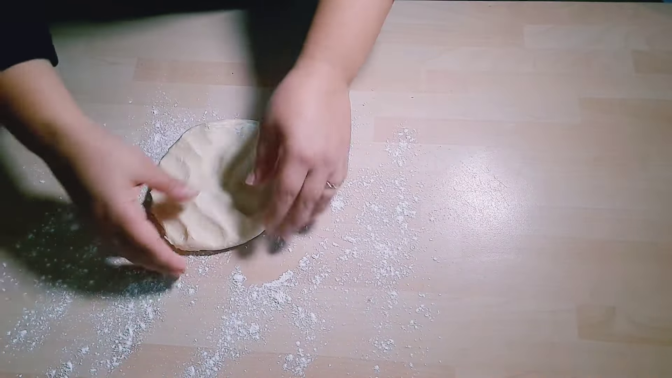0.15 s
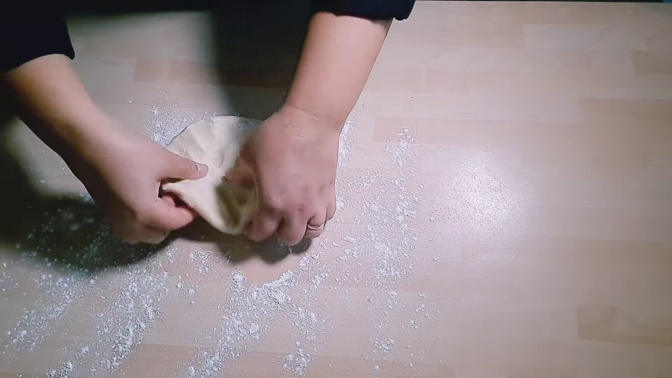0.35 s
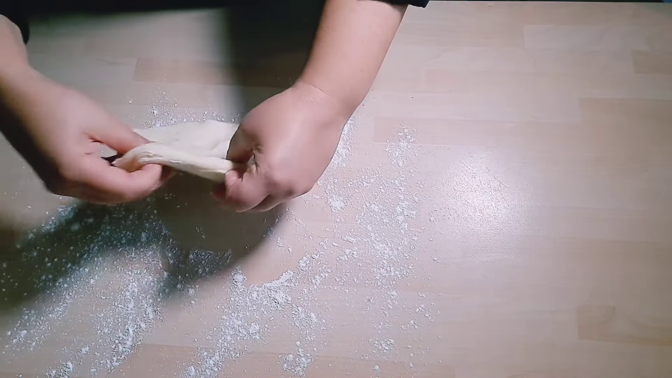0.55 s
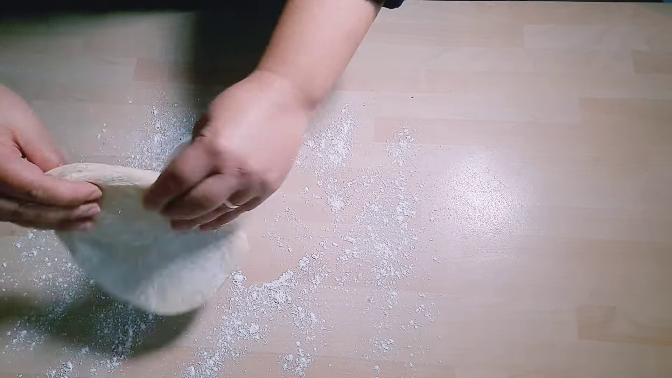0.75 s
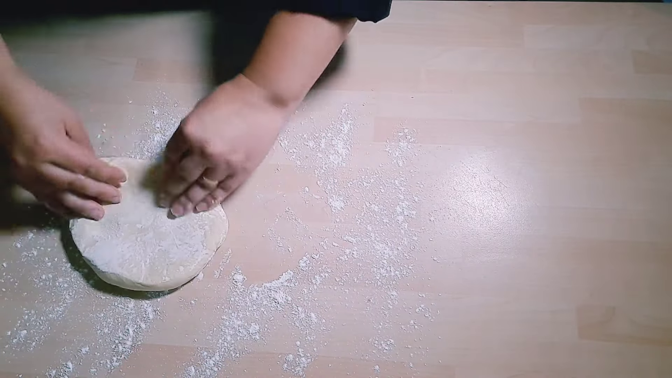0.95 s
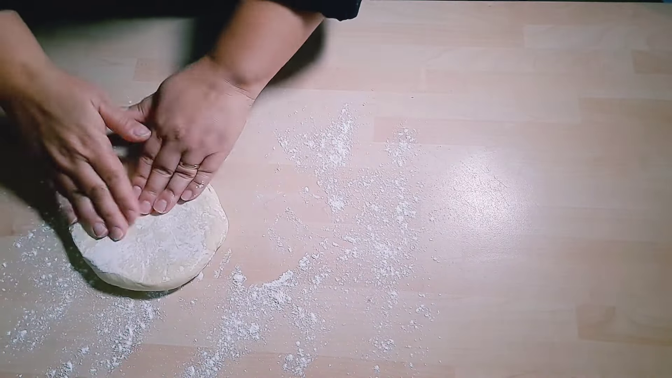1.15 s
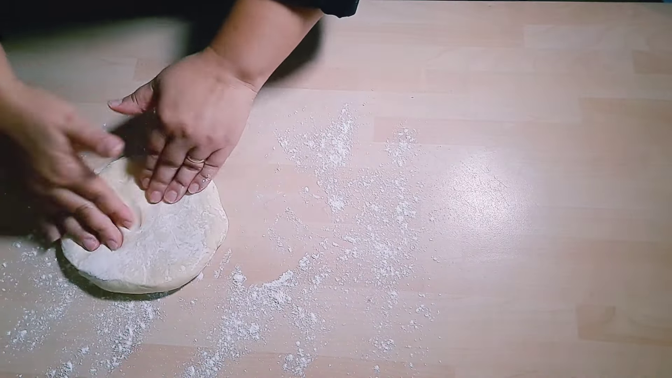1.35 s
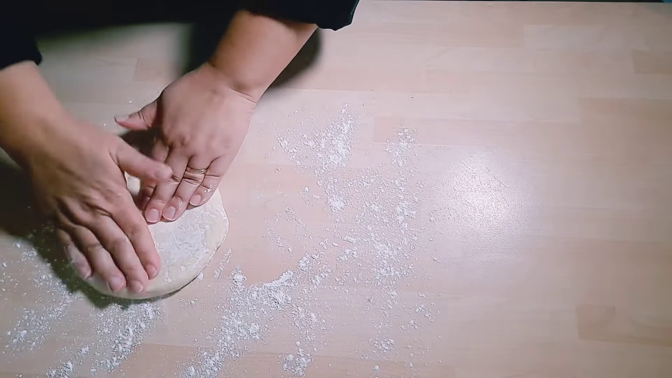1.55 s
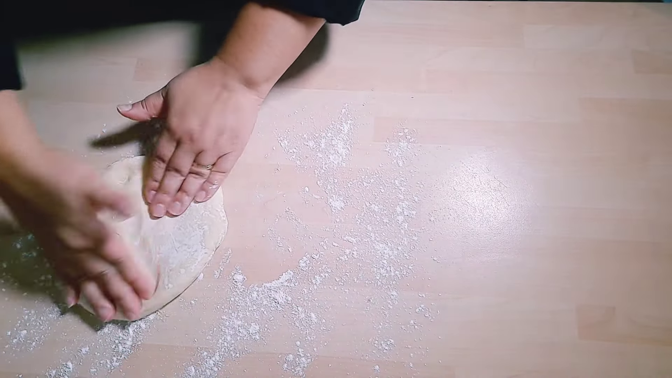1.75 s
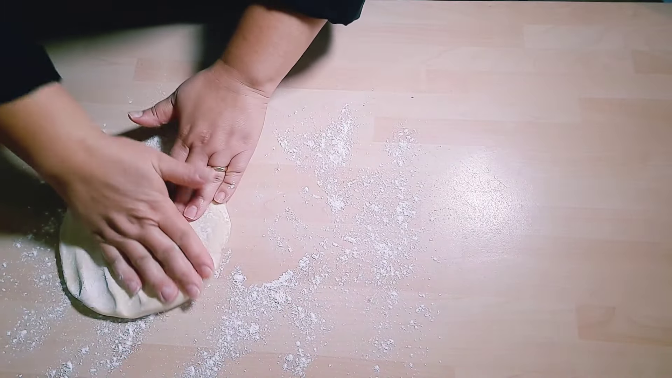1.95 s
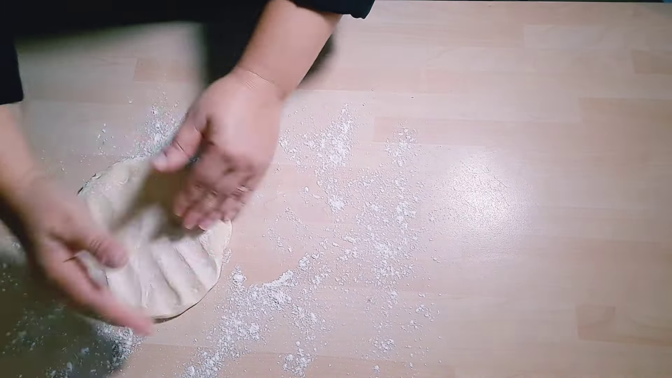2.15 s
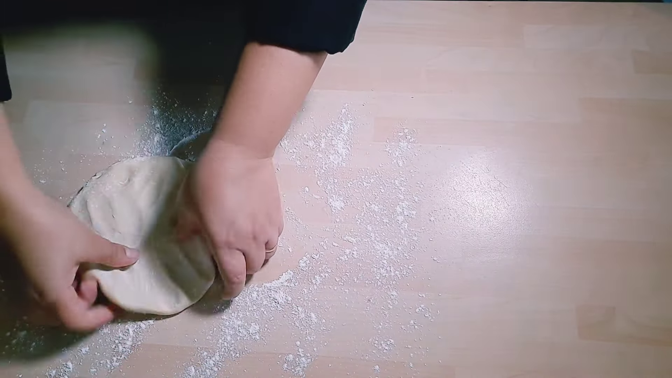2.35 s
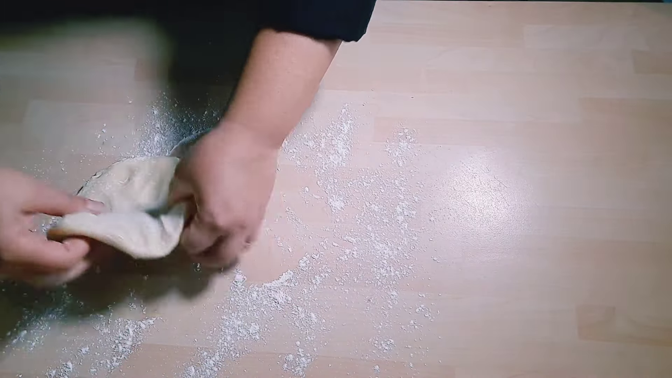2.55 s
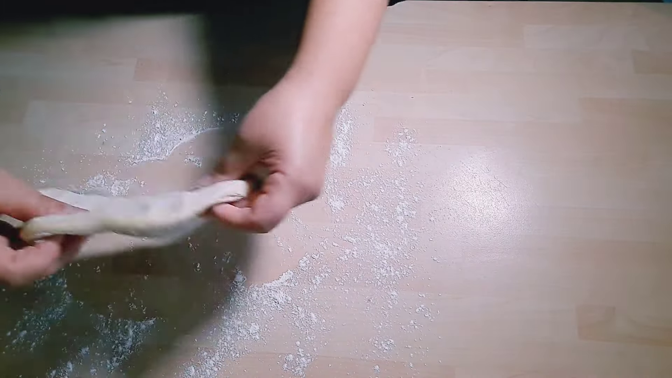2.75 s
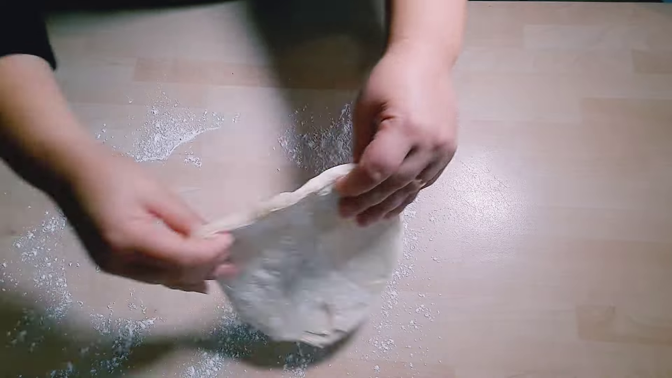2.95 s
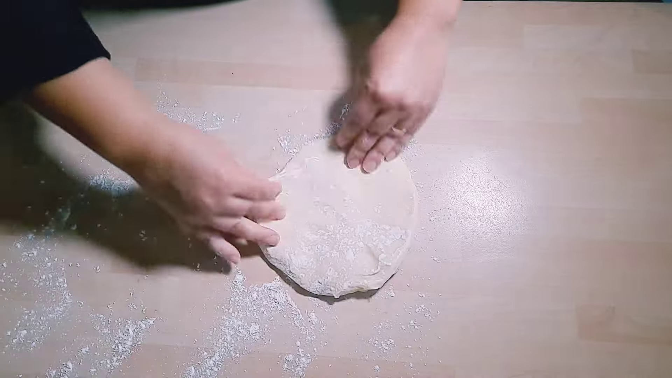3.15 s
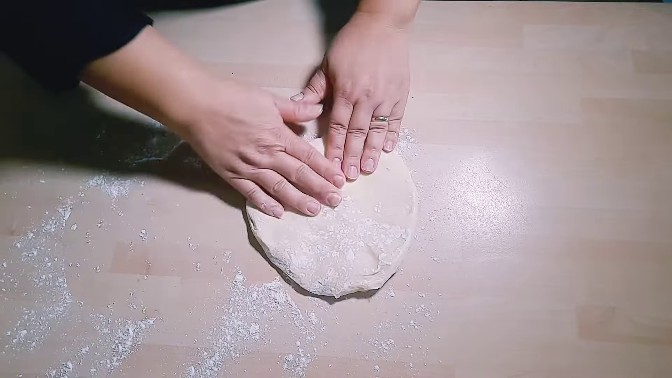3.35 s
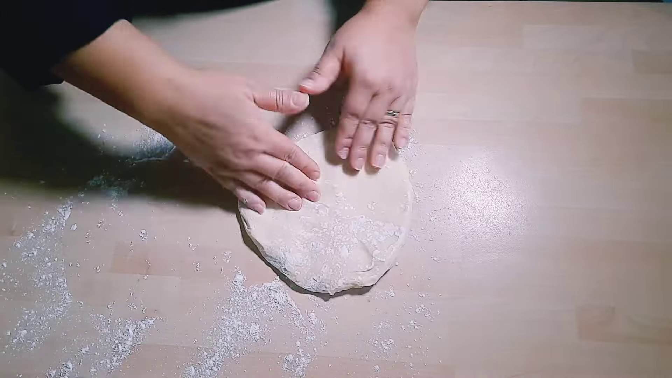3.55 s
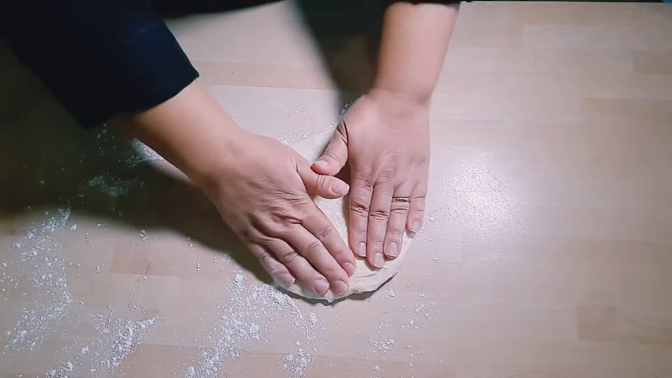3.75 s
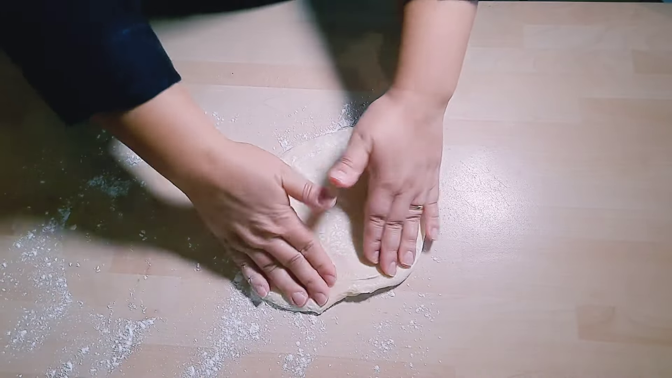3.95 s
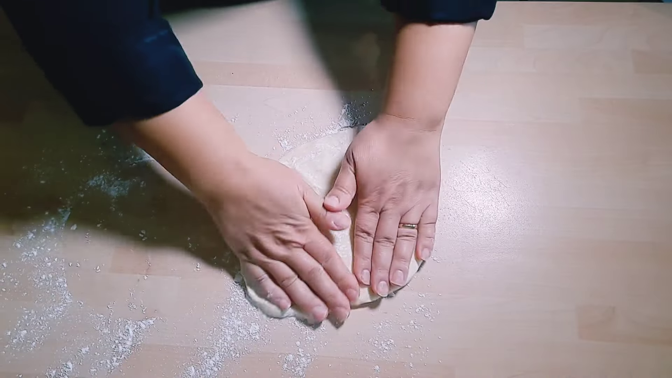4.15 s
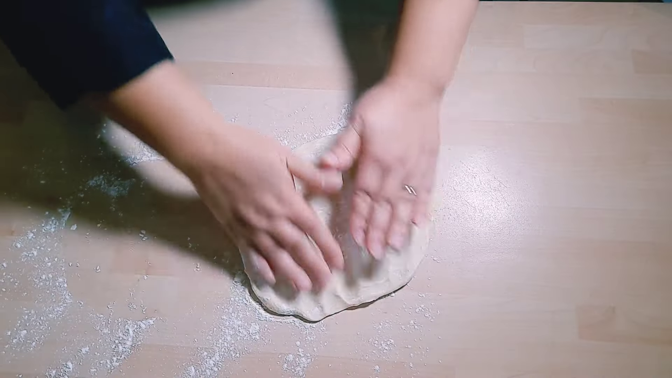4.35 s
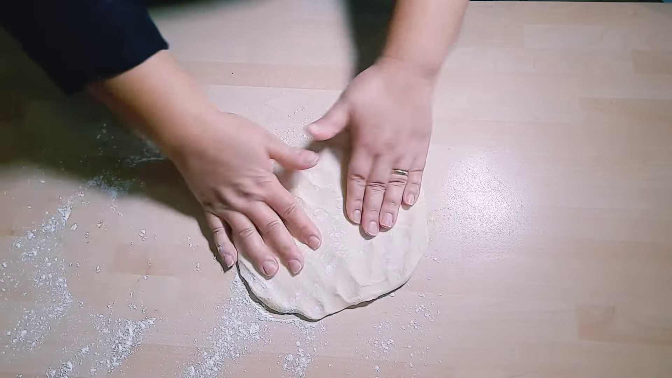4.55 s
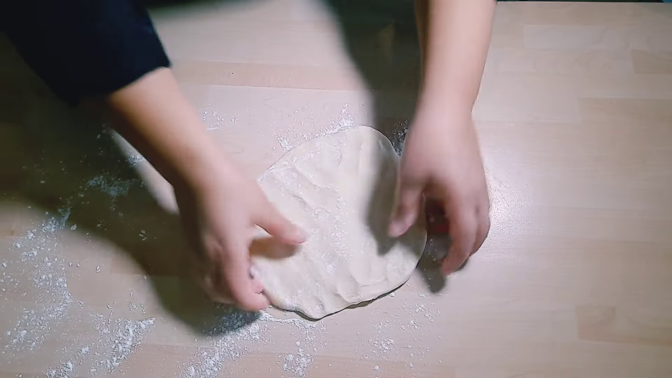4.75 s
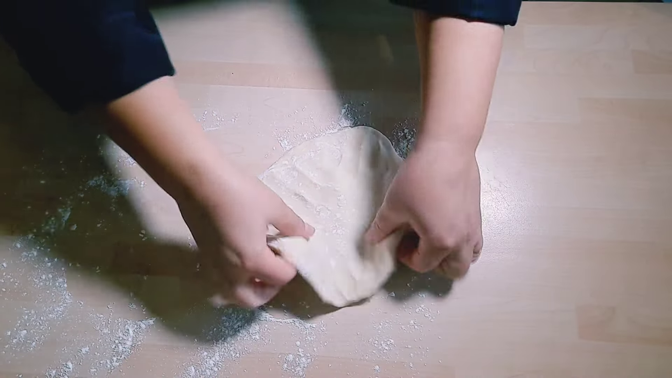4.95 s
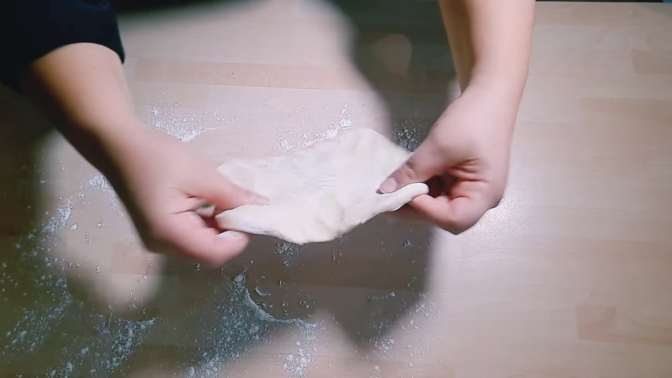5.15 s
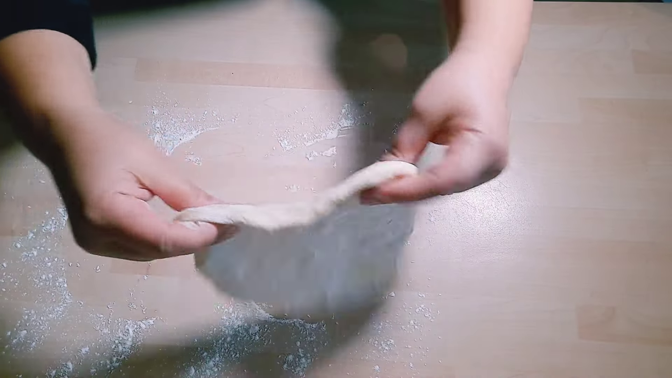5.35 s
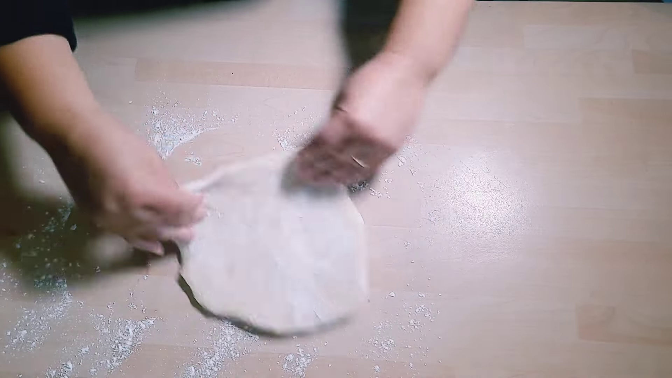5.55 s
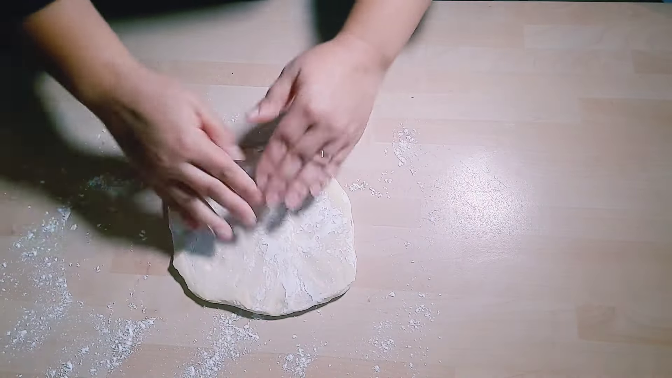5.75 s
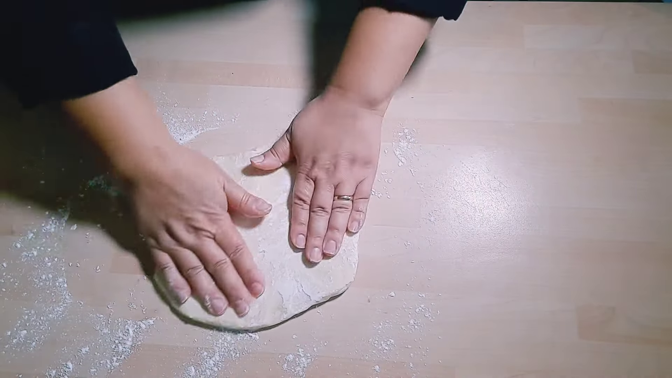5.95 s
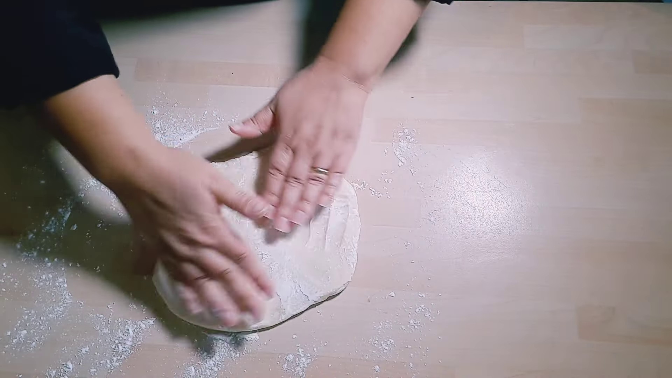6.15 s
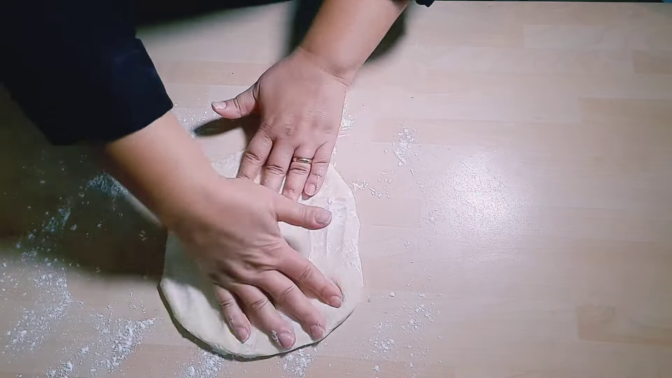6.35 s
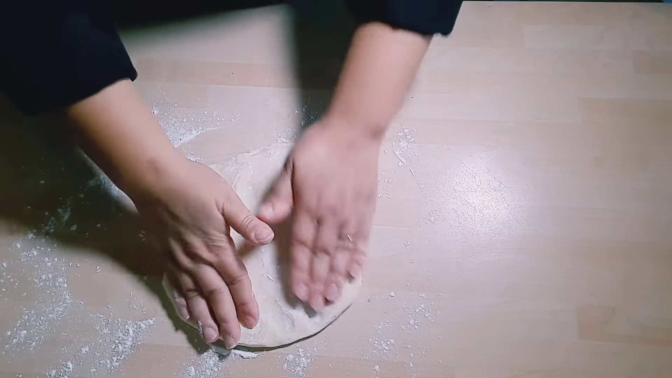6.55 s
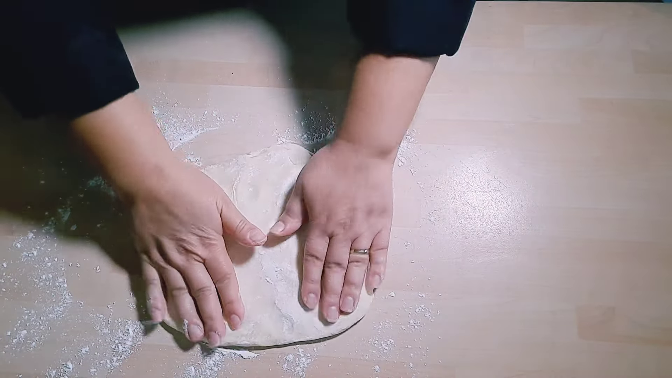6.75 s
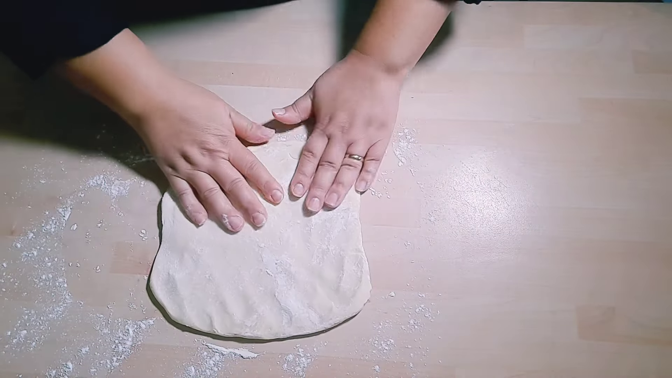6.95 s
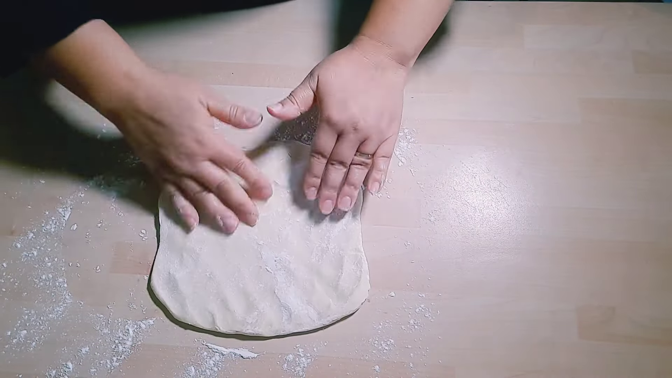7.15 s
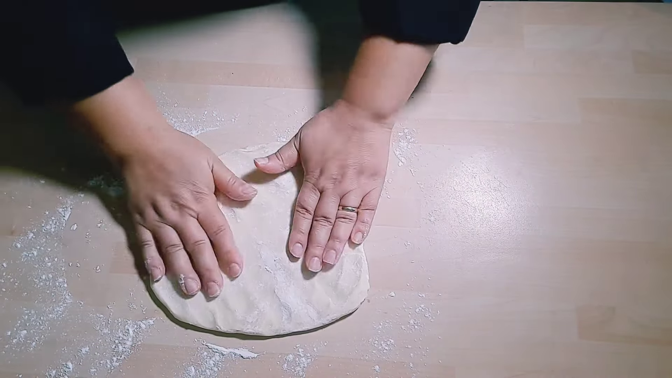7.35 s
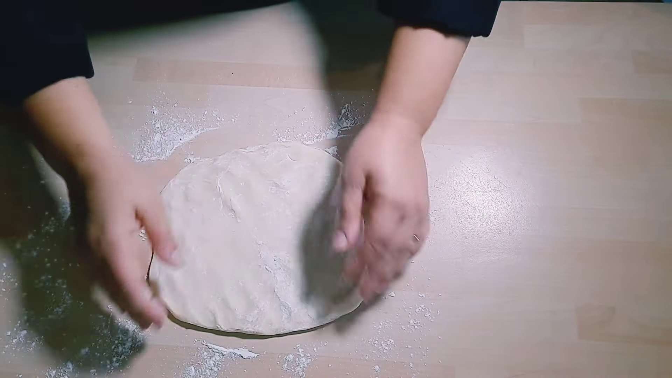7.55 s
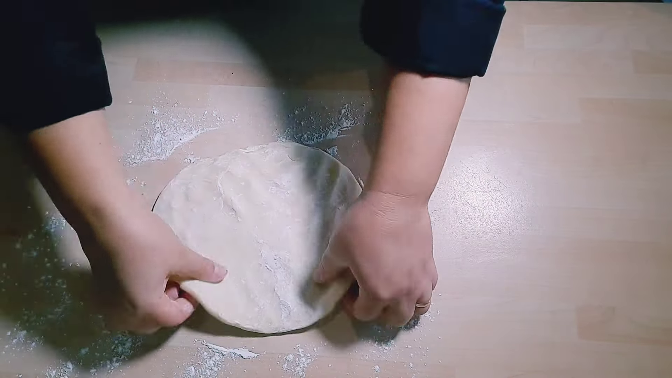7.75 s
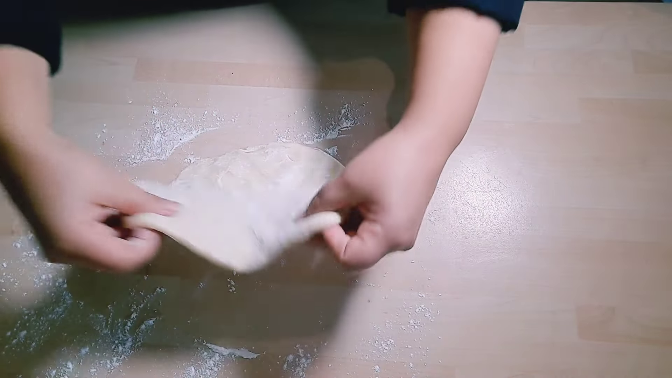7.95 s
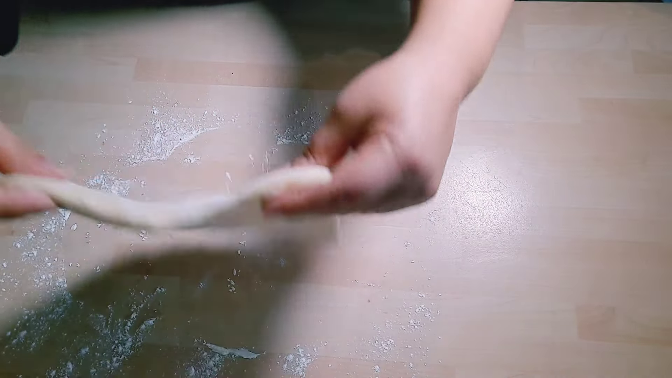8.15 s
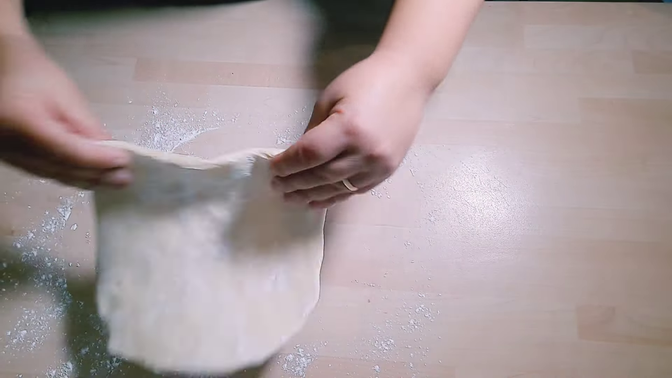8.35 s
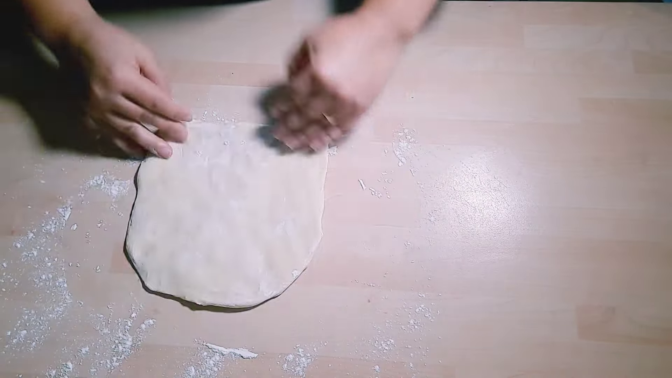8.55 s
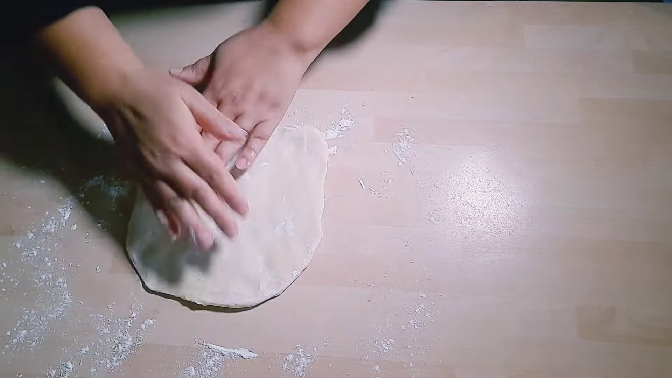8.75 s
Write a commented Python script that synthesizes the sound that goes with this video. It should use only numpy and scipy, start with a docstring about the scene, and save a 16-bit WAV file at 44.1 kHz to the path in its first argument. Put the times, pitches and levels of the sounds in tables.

```python
"""Hands pat, lift and drop a flat of soft dough on a wooden worktop in a quiet kitchen, in stereo.
Each blow rings the modes of the board as dying sines, and air slaps out from under the palm as a
resonant puff of noise. Squeaks of trapped air, bright cracks and the swelling noise of floury skin on
dough lie around the blows. Bare walls return a short echo; room hum and microphone hiss lie behind."""
import sys
import numpy as np
from scipy import signal
from scipy.fft import rfft, irfft
from scipy.io import wavfile
from scipy.ndimage import uniform_filter1d

SR = 44100
rng = np.random.default_rng(int(sys.argv[2]) if len(sys.argv) > 2 else 0)


def store_wav(level_fs):
    """Save 16-bit WAV to argv[1]."""
    pcm = np.round(np.clip(np.atleast_2d(level_fs), -1, 1) * 32767)
    wavfile.write(sys.argv[1], SR, pcm.T.astype(np.int16))


N = 388080  # length [samples]

# Palm, fingers or dough landing; levels are those of each layer before the mix: (time [s],
# slap [dB], deep ring [dB], middle ring [dB], knock ring [dB], treble crack [dB], slap pitch [Hz])
BLOWS = [(0.023, -52, -57.5, -67, -60.5, -67, 1800), (0.071, -69, -73, -67, -62.5, -74, 1940),
         (0.2125, -63, -59, -50, -47.5, -49.5, 1540), (0.2594, -49, -40.5, -40.5, -39.5, -53, 1530),
         (0.2883, -39, -47, -44.5, -47, -52, 1750), (0.5753, -77, -71, -85, -69, -73, 1530),
         (0.896, -38.5, -39, -36.5, -42.5, -60, 1630), (0.9236, -43, -38, -40, -44, -65, 1580),
         (0.957, -34, -35, -30.5, -63, -52, 1680), (0.9622, -26, -44, -52, -38.5, -62, 1440),
         (1.175, -59, -51.5, -59, -67.5, -81, 1600), (1.205, -66, -68, -60, -66, -66, 2160),
         (1.365, -61, -80, -62, -67, -76, 1250), (1.5335, -56, -47, -56.5, -65, -64, 1560),
         (1.8915, -62, -46, -52.5, -63, -66, 1270), (1.9284, -88, -49.5, -57.5, -66, -82, 1550),
         (2.265, -56, -54.5, -74, -50.5, -61, 2020), (2.3064, -65, -56, -45.5, -40.5, -51.5, 1540),
         (2.336, -64, -64, -40.5, -43.5, -48, 1210), (2.364, -46, -58, -42, -44, -65, 1620),
         (2.631, -61, -85, -70, -61, -56, 2010), (3.067, -62, -60, -64, -62, -73, 1200),
         (3.164, -74, -39, -41, -41, -64, 1570), (3.34, -57, -56, -61, -69, -59, 1800),
         (3.3577, -55, -46, -57, -64, -56, 1890), (3.749, -57, -58, -71, -53.5, -54, 1500),
         (4.117, -45.5, -46.5, -57.5, -68, -63, 1400), (4.442, -26, -33, -40, -43.5, -36.5, 1340),
         (4.7627, -64, -59, -59, -54, -52, 1870), (5.005, -56, -62, -76, -67.5, -59, 1240),
         (5.5502, -35, -37.5, -51, -42.5, -55, 1130), (5.563, -25.5, -56, -46, -41.5, -58, 1220),
         (5.6003, -21, -55, -44, -33.5, -44, 1780), (5.61, -24, -54, -61, -43, -43, 1400),
         (5.9394, -49, -61, -62, -78, -57, 2060), (6.223, -62, -54.5, -63, -63, -63, 1230),
         (6.2618, -70, -51.5, -64, -59.5, -67, 1860), (6.6488, -43.5, -38.5, -56, -72, -64, 1540),
         (6.6777, -53, -49, -54, -57, -53, 1550), (6.9527, -34.5, -38.5, -59, -40.5, -41, 1910),
         (6.967, -30, -35.5, -39, -42.5, -45, 1450), (7.3447, -26, -26, -39, -41, -54, 1950),
         (7.6835, -53, -64, -49, -45, -43, 1600), (7.718, -44, -82, -47.5, -40, -49, 1600),
         (8.464, -14.5, -57, -27, -28.5, -37, 2300), (8.471, -22.5, -24.5, -47, -29.5, -36, 1170)]
# Hands sliding on dough or lifting it; levels are before the mix, swell and fade each cover SPAN_DB:
# (time of full strength [s], swell [s], hold [s], fade [s], flour hiss [dB],
#  skin hiss over flour hiss [dB], press on the board [dB]); hold and fade are before stretching
STROKES = [(0.044, 0.12, .005, .12, -62.5, 3.5, -54.5), (0.205, 0.051, 0.16, 0.22, -55.5, -2, -47.5),
           (0.552, 0.17, .04, 0.047, -68, -18, -82), (0.912, 0.021, 0.075, 0.084, -57.5, 4.5, -53),
           (0.985, .012, .02, 0.085, -69.5, 18, -66), (1.242, 0.16, .005, .3, -61, -18, -64),
           (1.369, 0.034, .005, 0.17, -58.5, -12, -59), (1.58, .1, 0.025, 0.078, -63, -7, -53),
           (1.648, 0.17, 0.029, 0.35, -61.5, -17, -65), (1.975, 0.14, 0.22, 0.16, -64, -10, -65),
           (2.303, .055, .15, 0.12, -55.5, 2, -46.5), (2.541, 0.058, .005, 0.18, -56, -10, -62),
           (2.626, 0.16, .02, 0.14, -60.5, -4.5, -63), (2.86, 0.29, 0.0045, 0.31, -67.5, -20, -88),
           (3.148, 0.11, 0.023, 0.12, -51, -9, -55), (3.17, .012, .04, .08, -62, 4, -40),
           (3.363, 0.05, .05, 0.12, -62.5, 1, -52.5), (3.476, .2, .005, 0.32, -57.5, -7, -67),
           (3.755, 0.051, .09, .11, -54, -6, -54.5), (3.99, 0.37, .005, 0.13, -64.5, -2, -71),
           (4.14, .07, .005, 0.25, -54, -5, -61), (4.254, 0.081, 0.14, 0.76, -67, -3, -66.5),
           (4.445, 0.013, 0.027, 0.13, -51.5, 8, -37), (4.541, 0.033, .01, 0.076, -72, 13, -53),
           (4.61, 0.049, 0.0054, 0.11, -57.5, -9, -62.5), (4.773, 0.049, 0.11, 0.22, -54.5, 2, -58),
           (5.045, 0.55, 0.098, .14, -63, -10, -65), (5.3, 0.17, 0.042, 0.18, -96, 5, -67.5),
           (5.507, 0.26, 0.067, 0.11, -66.5, -7, -64), (5.559, 0.015, 0.044, 0.1, -49.5, 8, -58),
           (5.608, .01, 0.019, 0.082, -54, 16.5, -58), (5.933, 0.091, 0.1, 0.085, -49, -11, -58.5),
           (6.096, 0.032, 0.0046, 0.15, -56.5, -12, -65), (6.297, 0.057, 0.066, .09, -48.5, -11, -55.5),
           (6.458, 0.22, .005, 0.32, -61.5, -4, -68), (6.646, 0.088, 0.031, 0.18, -53, -5, -51.5),
           (6.813, 0.048, .005, 0.24, -55.5, -10, -64.5), (6.978, 0.049, 0.017, 0.12, -46, 3, -45),
           (7.174, 0.1, .005, 0.084, -65, -4, -76), (7.35, 0.012, 0.0041, 0.16, -53, 14, -34),
           (7.469, 0.054, 0.023, 0.15, -62.5, -15, -58), (7.718, 0.092, 0.0087, 0.17, -49, 6, -45),
           (7.87, 0.13, 0.089, 0.18, -65.5, -2, -65), (8.04, 0.14, .005, 0.14, -58, -10, -66),
           (8.244, 0.11, .02, 0.35, -76, 4, -63), (8.502, 0.03, 0.056, 0.1, -52, 17.5, -28),
           (8.786, 0.12, .005, 0.2, -67.5, 1.5, -69)]
# Likeness of the two channels for rubbing and cracks: (frequency [Hz], correlation [-1 to 1])
RUB_SAME = [(500, 0.24), (1500, 0.18), (3000, 0.04), (7000, 0.017)]

DEEP, MIDDLE, KNOCK, TOP = (0, 149), (149, 212), (212, 770), (770, 3000)  # mode families (from, to) [Hz]
SPAN_DB = 20  # level change over one swell or fade [dB]
FLOUR_LASTS, SKIN_LASTS, PRESS_LASTS = 0.85, 0.95, 0.6  # stretch of hold and fade
FLOUR_REST_DB, SKIN_REST_DB, PRESS_REST_DB = -81.5, -73.5, -72.5  # hands at rest, before the mix [dB]
SLAP_S, SLAP_SHARP = 0.00351, 1.98  # decay time [s]; pitch over width of each resonance pass
SQUEAK_SHARP = 8.5  # pitch over width of each resonance pass
QUIET_DB = -65.5
EDGE_HZ = 15800  # upper band limit [Hz]


def worktop():
    """Blows strike the board at once; leaning hands shake it faintly with a random force."""
    s, _, deep_db, middle_db, knock_db, *_ = np.transpose(BLOWS)
    press = stroking(np.transpose(STROKES)[-1], PRESS_LASTS, PRESS_REST_DB)
    board = np.zeros(N)
    # (modes, blow levels [dB], rise [s], share of the press [dB])
    families = (
        (DEEP, deep_db, 0.006, -4),
        (MIDDLE, middle_db, 0.004, -9),
        (KNOCK, knock_db, 0.0015, -5),
    )
    for modes, blow_db, rise_s, press_db in families:
        response = ring(modes, rise_s)
        force = np.zeros(N)
        force[(s * SR).astype(int)] = gain_of(blow_db)
        shaking = press * rng.standard_normal(N) / np.linalg.norm(response)
        force += gain_of(press_db) * shaking
        board += signal.fftconvolve(force, response)[:N]
    return board


def ring(family, rise_s):
    """Response of the board to one push: dying sines that start together, rms 1 in the first 40 ms."""
    # Worktop modes: (frequency [Hz], relative level [dB], t60 [s], sign of the first swing)
    modes = [(82.9, -7, 0.26, 1), (97.6, 6.5, .22, 1), (111.4, -5, 0.18, -1), (119.1, 8.5, 0.18, 1),
             (135, -34, 0.12, -1), (159.4, -8.5, 0.15, 1), (177.4, -16.5, 0.15, 1), (212, -4.5, 0.028, 1),
             (240, -4, 0.074, 1), (270, -3, 0.019, 1), (300, 0.5, 0.14, 1), (313.4, 7.5, 0.077, 1),
             (333.6, 7.5, 0.14, 1), (427.7, -11.5, 0.13, -1), (506, -14.5, 0.11, 1), (534.5, -32, 0.19, -1),
             (609, -11.5, 0.084, 1), (657, -26.5, 0.25, -1), (741, -12.5, 0.065, 1), (846, 7.5, 0.072, -1),
             (1165, 13.5, 0.022, 1), (1201, 4.5, 0.13, -1), (1599, 2.5, 0.06, 1), (1840, -5, 0.07, -1),
             (2176, 2.5, 0.042, 1), (2480, -23, 0.23, -1), (2940, -13, 0.14, 1)]
    t = np.arange(SR // 2) / SR
    response = np.zeros(len(t))
    for hz, db, t60, sign in modes:
        if family[0] < hz <= family[1]:
            decay = gain_of(db - 60 * t / t60)
            response += np.sign(sign) * decay * np.sin(2 * np.pi * hz * t)
    response *= (1 - np.exp(-t / rise_s)) ** 2  # soft flesh loads the board gradually
    return response / np.sqrt(np.mean(response[:SR // 25] ** 2))


def hollow(x):
    """Passes a sound through the high modes of the board."""
    response = ring(TOP, 0.0015)
    return signal.fftconvolve(x, response[None] / np.linalg.norm(response), axes=1)[:, :N]


def slaps():
    """Air squeezed from under hand or dough; the same smack rings the high modes of the board."""
    smacks = np.zeros(N)
    noises = rng.standard_normal((len(BLOWS), 2000))
    for (s, db, *_, hz), noise in zip(BLOWS, noises):
        add(smacks, s, puff(db, hz, SLAP_S, SLAP_SHARP, noise, pop=1.6))
    return smacks + gain_of(-23) * hollow(smacks[None])[0]


def squeaks():
    """A pocket of air under the cupped hand squeaks open: puffs of noise through a narrow resonance."""
    # Squeaks: (time [s], peak before the mix [dB], pitch [Hz], decay time [s])
    openings = [(3.341, -61, 1580, 0.025), (3.378, -63, 2050, 0.078), (6.011, -36.5, 1670, 0.012),
                (6.026, -43, 1615, 0.016), (6.043, -46, 1780, 0.0095), (6.08, -56, 1640, 0.046)]
    squeaking = np.zeros(N)
    noises = rng.standard_normal((len(openings), 4000))
    for (s, db, hz, decay_s), noise in zip(openings, noises):
        add(squeaking, s, puff(db, hz, decay_s, SQUEAK_SHARP, noise, pop=0))
    return squeaking


def puff(db, hz, decay_s, sharp, noise, pop):
    """A dying puff of noise, with an optional pop, rings a pocket of air; sharp is pitch over width."""
    u = np.arange(len(noise)) / SR / max(decay_s, 0.0005)
    sound = noise * np.exp(-u) * (1 - np.exp(-u / 0.37))
    sound[int(decay_s * SR / 2)] += pop * np.linalg.norm(sound)  # single-sample pop
    for _ in range(2):
        sound = signal.lfilter(*signal.iirpeak(hz, max(sharp, 0.5), SR), sound)
    return gain_of(db) * sound / abs(sound).max()


def add(mix, s, sound):
    """Mixes a sound in at a time in seconds."""
    part = mix[int(s * SR):][:len(sound)]
    part += sound[:len(part)]


def cracks():
    """Skin and flour meet at each blow: a sudden bright spray, a sharp front on a longer fizz."""
    # Colour of the spray: (frequency [Hz], relative level per Hz [dB])
    spray = [(1500, -3), (3000, -9.5), (5000, 1), (8000, -1), (9500, -9), (13000, -20.5), (16000, -6)]
    level = np.zeros(N)
    t = np.arange(8000) / SR
    fall = np.exp(-t / 0.0036) + 0.13 * np.exp(-t / 0.053)  # front, then fizz
    for s, *_, crack_db, _ in BLOWS:
        add(level, s, gain_of(crack_db) * fall)
    return level * hiss(spray, RUB_SAME, patchy_db=1.0, size=256)


def rubbing():
    """Flour grains give the bright hiss, broad skin contact the fuller one, which the board colours."""
    # Colour of flour grains: (frequency [Hz], relative level per Hz [dB])
    flour_colour = [(1470, -15), (2500, -8), (3110, -6.5), (3630, -5.5), (5230, -0.5), (6810, 0.5),
                    (7890, 1), (9360, -7), (13800, -2.5), (16000, -6)]
    # Colour of broad skin contact: (frequency [Hz], relative level per Hz [dB])
    skin_colour = [(500, 10.5), (800, -4.5), (1500, 0), (2200, 0), (3500, -4.5), (6000, -13)]
    *_, flour_db, fuller_db, _ = np.transpose(STROKES)
    flour = stroking(flour_db, FLOUR_LASTS, FLOUR_REST_DB)
    flour = flour * hiss(flour_colour, RUB_SAME, patchy_db=1.1, size=256)
    skin = stroking(flour_db + fuller_db, SKIN_LASTS, SKIN_REST_DB)
    skin = skin * hiss(skin_colour, RUB_SAME, patchy_db=2.5, size=256)
    return flour + gain_of(-3.5) * skin + gain_of(-20.5) * hollow(skin)


def stroking(peak_db, lasts, rest_db):
    """Level over time of one layer: each stroke swells, holds and fades; their powers add."""
    t = np.arange(0, N / SR + 0.002, 0.001)
    s, swell, hold, fade = np.transpose(STROKES)[:4, :, None]
    before = (s - t) / np.maximum(swell, 0.005)
    after = (t - s - lasts * abs(hold)) / np.maximum(lasts * fade, 0.01)
    away = np.maximum(np.maximum(before, after), 0)  # 0 while the stroke holds
    level = gain_of(peak_db[:, None] - SPAN_DB * away)
    total = np.sqrt((level ** 2).sum(axis=0) + gain_of(rest_db) ** 2)
    return np.interp(np.arange(N) / SR, t, total)


def kitchen(x):
    """Echo of the room: sparse taps of random sign, each band dying at its own speed."""
    # Decay of the kitchen: (frequency [Hz], t60 [s])
    decay = [(300, 0.21), (1000, 0.27), (2500, 0.23), (6000, 0.37), (12000, 0.21)]
    taps = np.zeros((2, SR // 2))
    count = (SR // 2 - 201) // 20  # one tap at random in every 20 samples
    at = np.arange(200, SR // 2 - 20, 20) + rng.integers(0, 20, (2, count))
    np.put_along_axis(taps, at, rng.choice([-1., 1.], at.shape), 1)
    hz, t, bands = signal.stft(taps, SR, nperseg=256)
    bands = bands * gain_of(-60 * t / read(decay, hz)[:, None])
    tail = signal.istft(bands, SR, nperseg=256)[1]
    return signal.fftconvolve(x[None], tail / np.linalg.norm(tail[0]), axes=1)[:, :N]


def quiet_room():
    """Hum of the room and hiss of the microphones: steady coloured noise, partly shared by both."""
    # Colour of the background: (frequency [Hz], relative level per Hz [dB])
    colour = [(18, -44), (30, 9.5), (90, -6.5), (134, -11), (215, -9.5), (311, -4), (449, -11.5),
              (512, -19.5), (913, -19), (4530, -38.5), (8080, -17.5), (9460, -27.5), (11100, -28),
              (13300, -30), (16000, -30.5)]
    # Likeness of the two channels: (frequency [Hz], correlation [-1 to 1])
    likeness = [(60, 0.51), (240, 0.65), (950, -0.095), (3770, -0.43), (15000, 0.21)]
    return gain_of(QUIET_DB) * hiss(colour, likeness, patchy_db=3.0, size=1024)


def hiss(colour, likeness, patchy_db, size):
    """Two-channel noise of a given colour, rms 1, with small random patches in time and frequency."""
    hop, hz = size // 4, np.fft.rfftfreq(size, 1 / SR)
    a, b, c, d, patches = rng.standard_normal((N // hop + 5, len(hz), 5)).T
    patches = uniform_filter1d(patches, size=len(hz) // 30, axis=0)
    patches = evened(uniform_filter1d(patches, size=2560 // hop, axis=1))
    same = np.clip(read(likeness, hz), -1, 1)[:, None]
    left = a + 1j * b
    right = same * left + np.sqrt(1 - same ** 2) * (c + 1j * d)
    bands = np.array([left, right]) * gain_of(read(colour, hz)[:, None] + patchy_db * patches)
    return evened(signal.istft(bands, nperseg=size, noverlap=size - hop)[1][:, :N])


def evened(x):
    """Scales to rms 1."""
    return x / np.sqrt(np.mean(x ** 2) + 1e-20)


def read(points, hz):
    """Reads a table on a log-frequency axis."""
    f, value = np.transpose(points)
    return np.interp(np.log(hz + 1), np.log(f + 1), value)


def gain_of(db):
    """Decibels to gain."""
    return 10 ** (np.asarray(db) / 20)


def scene():
    """Board, puffs of air and their echo, cracks, rubbing and the quiet room."""
    board = worktop()
    air = slaps() + squeaks()
    # the bare walls return the upper part of the knock, differently to each ear
    upper = signal.sosfilt(signal.butter(2, 450, "high", fs=SR, output="sos"), board)
    echo = gain_of(-4) * kitchen(air) + gain_of(-31) * kitchen(board) + kitchen(upper)
    return board + gain_of(-4) * air + echo + cracks() + rubbing() + quiet_room()


def record(dry):
    """Bass cut; the left microphone hears more in most bands; then the upper band limit."""
    # Balance of the microphones: (frequency [Hz], left minus right [dB])
    balance = [(100, 1.8), (400, 1.9), (700, 4.7), (1290, 5.5), (2380, 4.5), (4400, 2.5), (8120, -0.5),
               (11000, 10.5), (15000, 2)]
    cut = signal.sosfilt(signal.butter(3, 68, "high", fs=SR, output="sos"), dry)
    lean = gain_of(read(balance, np.fft.rfftfreq(N, 1 / SR)) / 2)  # half up on the left, half down right
    leaned = irfft(rfft(cut) * [lean, 1 / lean], N)
    band_limit = signal.firwin(511, EDGE_HZ, window=("kaiser", 9), fs=SR)
    return signal.oaconvolve(leaned, band_limit[None], "same")


dry = scene()
out = record(dry)
store_wav(out)
```